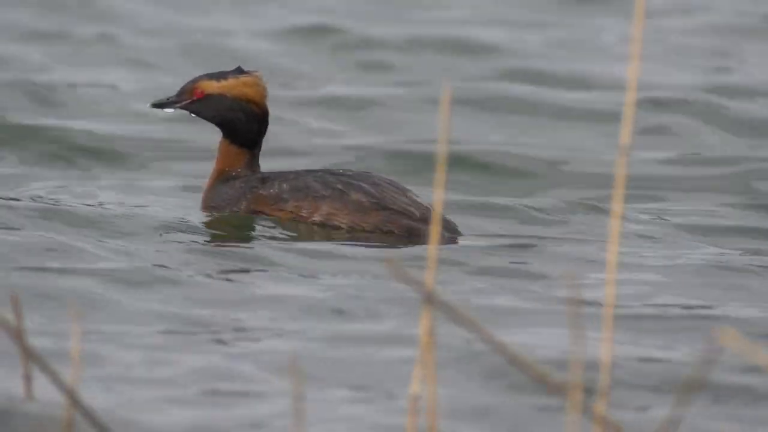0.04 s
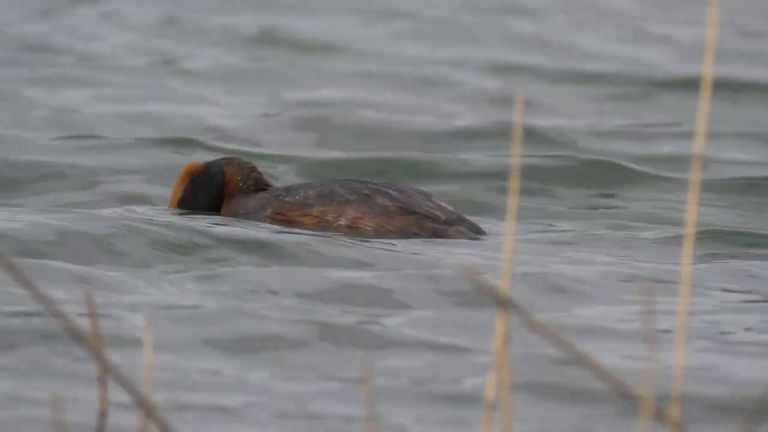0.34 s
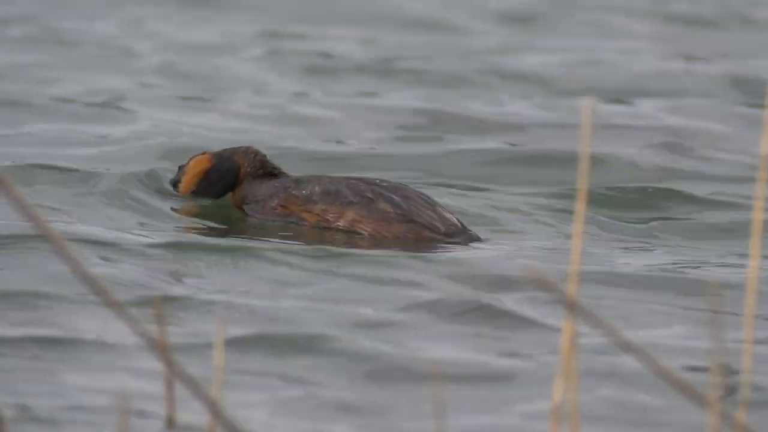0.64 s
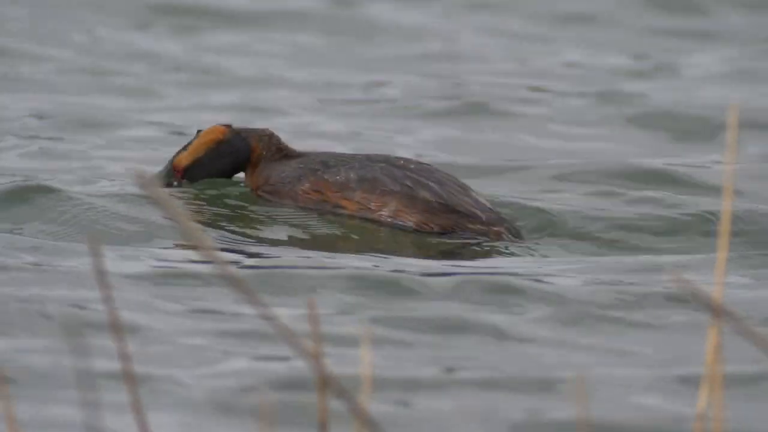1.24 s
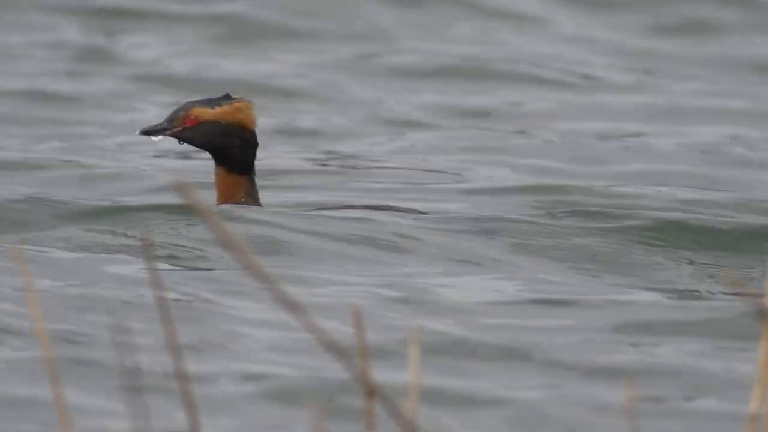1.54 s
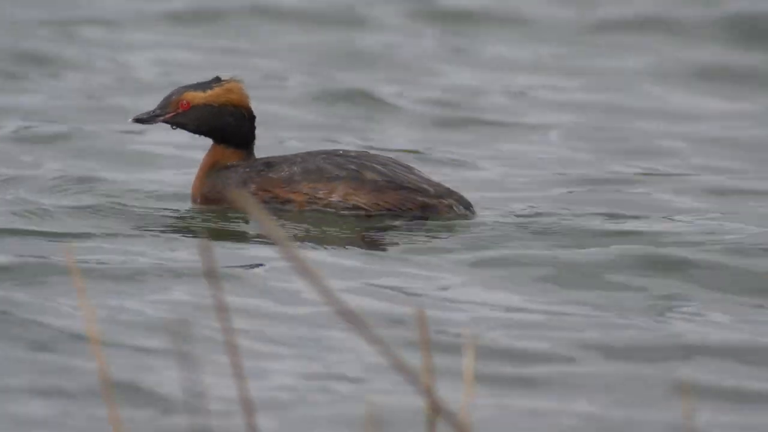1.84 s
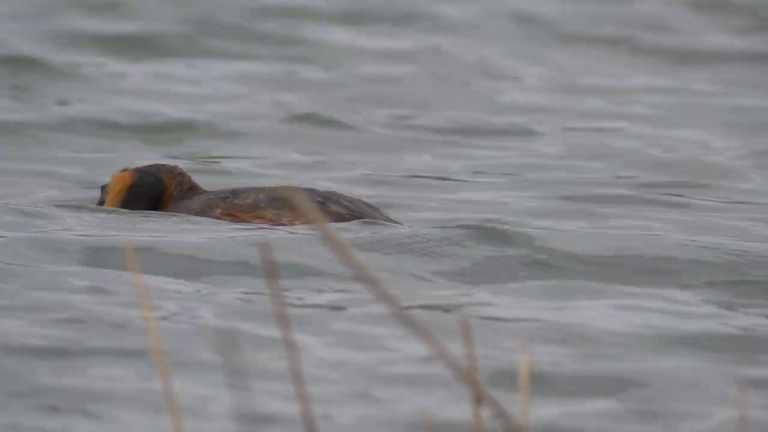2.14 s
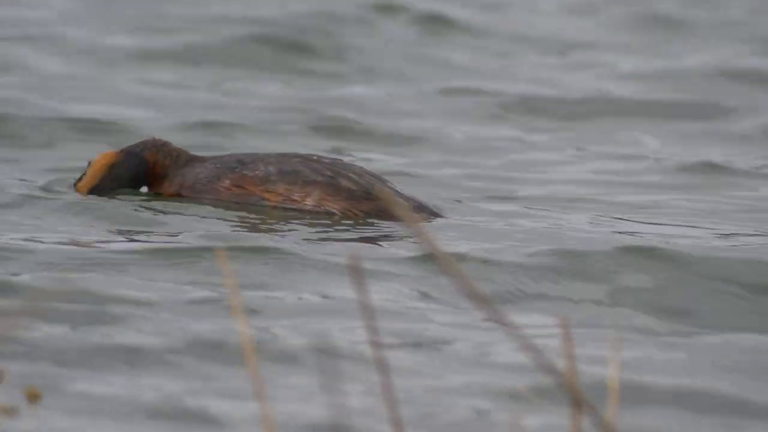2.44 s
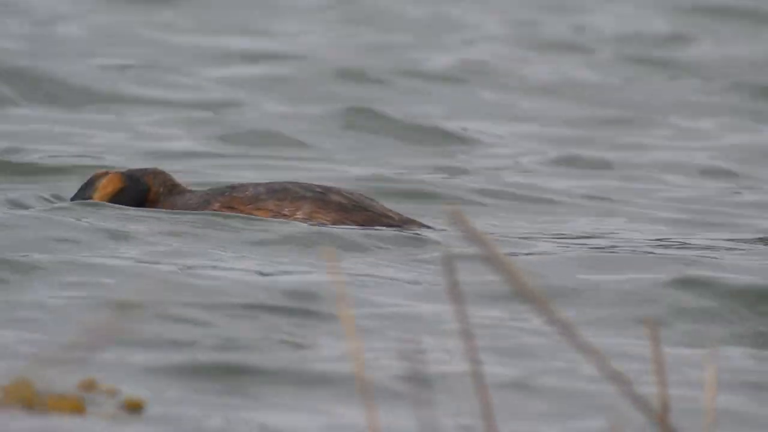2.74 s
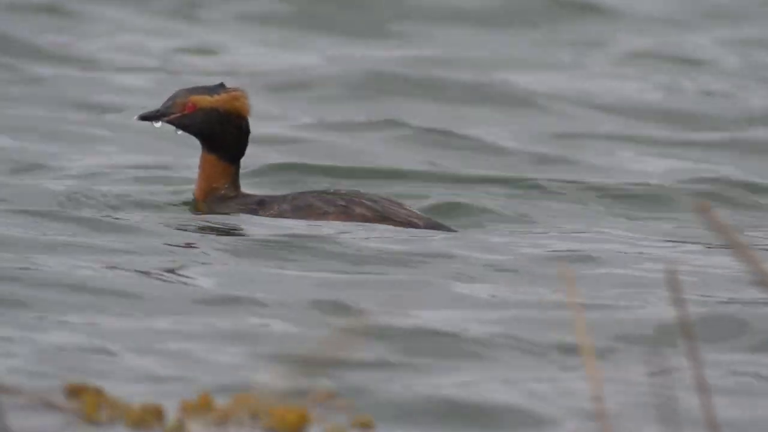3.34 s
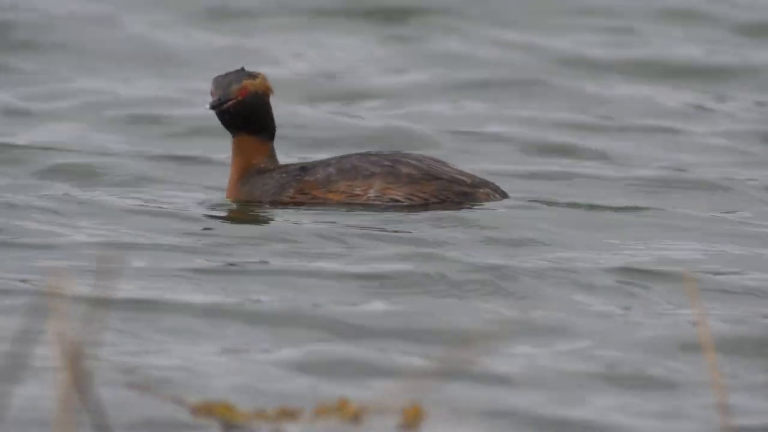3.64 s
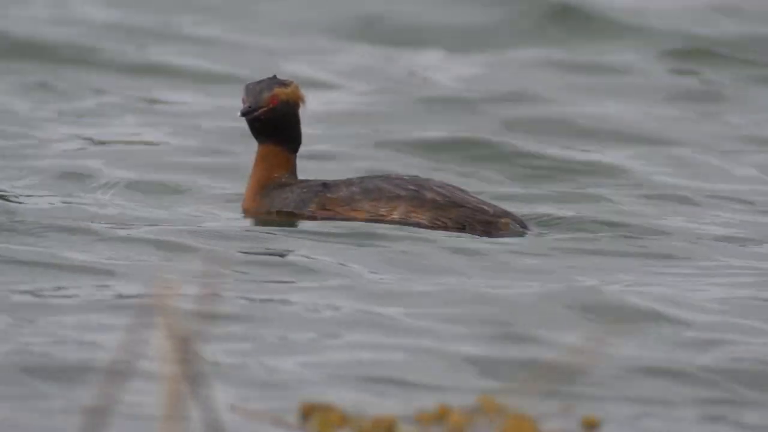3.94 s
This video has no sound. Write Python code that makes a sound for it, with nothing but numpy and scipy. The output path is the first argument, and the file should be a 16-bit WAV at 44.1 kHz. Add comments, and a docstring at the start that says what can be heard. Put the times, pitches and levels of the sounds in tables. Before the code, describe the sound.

Terns call at a lake shore, first with harsh rattling rasps, then a run of high piping notes and trills. Distant gulls wail near the end. Wind rumbles and thumps on the microphone throughout, over faintly washing water.

```python
"""Wind rumbles and thumps on a microphone at a lake shore while waterbirds call.
Terns rasp and yelp (harmonic pulses shaped by the throat), pipe and trill (near-pure tones).
A duck whistles once and distant gulls wail, each on one gliding partial.
Small waves wash and drip as coloured noise; the shore returns a faint echo of the calls."""
import sys
import numpy as np
from scipy import signal
from scipy.fft import rfft, irfft, next_fast_len
from scipy.io import wavfile
from scipy.ndimage import map_coordinates

SR = 44100
rng = np.random.default_rng(int(sys.argv[2]) if len(sys.argv) > 2 else 0)


def to_wav(sig):
    """Store sig (one row per channel, or 1-D mono) as 16-bit WAV at the path in sys.argv[1].

    Samples outside -1..1 are clipped; the rate is SR.
    """
    pcm = np.clip(np.atleast_2d(sig), -1, 1) * 32767
    pcm = np.round(pcm).astype(np.int16)
    wavfile.write(sys.argv[1], SR, pcm.T)  # frames by channels


N = 176400

# tern throat response (frequency [Hz], gain [dB])
TERN_THROAT = [(1000, -47), (2350, -8.5), (2620, 1), (3000, 2), (3350, -4.5), (3950, 4), (4400, 1.5),
               (5200, -28), (6150, -15.5), (7200, -39)]
TERN_PITCH_HZ = 773.3


def amp(db):
    """Decibels to gain."""
    return 10 ** (np.asarray(db) / 20)


def unit(x):
    """Scale to rms 1."""
    return x / np.sqrt(np.mean(x ** 2) + 1e-20)


def colour(x, points, tilt_db=0):
    """Filter by (Hz, dB) points; tilt_db peaks at 4.4 kHz, fading to 0 an octave either side."""
    size = next_fast_len(x.shape[-1], True)
    hz = np.fft.rfftfreq(size, 1 / SR) + 1
    point_hz, point_db = np.transpose(points)
    gain_db = np.interp(np.log(hz), np.log(point_hz), point_db)
    gain_db += tilt_db * np.clip(1 - abs(np.log2(hz / 4400)), 0, 1)
    return irfft(rfft(x, size) * amp(gain_db), size)[..., :x.shape[-1]]


def wander(size, rate_hz):
    """Smooth random curve, rms about 1."""
    at = np.arange(size) * rate_hz / SR
    return map_coordinates(rng.standard_normal(4096), [at], order=2, mode="wrap")


def level(curve):
    """Gain along (s, dB) points."""
    return amp(np.interp(np.arange(N) / SR, *np.transpose(curve)))


def pan(db):
    """Stereo gains for a left-minus-right level."""
    return amp(np.array([[db / 2], [-db / 2]]))


def add(mix, start_s, sound):
    """Mix a sound in at start_s."""
    start = round(start_s * SR)
    sound = sound[max(-start, 0):]
    part = mix[max(start, 0):][:len(sound)]
    part += sound[:len(part)]


def gate(t, attack_s, release_s):
    """Envelope with quarter-sine ramps."""
    rise = np.sin(np.pi / 2 * np.clip(t / attack_s, 0, 1))
    fall = np.sin(np.pi / 2 * np.clip((t[-1] - t) / release_s, 0, 1))
    return rise * fall


def phase(hz):
    """Running phase [rad] of a pitch curve."""
    return 2 * np.pi * np.cumsum(hz) / SR


def stereo_noise(points, correlation):
    """Coloured noise, partly shared by both channels."""
    mid, side = rng.standard_normal((2, N))
    side *= np.sqrt((1 - correlation) / (1 + correlation))
    return unit(colour(np.array([mid + side, mid - side]), points))


def burst(hz, decay_s, skirt_db):
    """Fast-dying noise puff centred on hz, at skirt_db an octave above."""
    t = np.arange(8192) / SR
    band = [(hz / 8, 2 * skirt_db), (hz / 2, skirt_db / 2), (hz, 0),
            (hz * 2, skirt_db), (hz * 8, 4 * skirt_db)]
    noise = colour(rng.standard_normal(len(t)), band)
    envelope = t / decay_s * 2 * np.exp(1 - 2 * t / decay_s)
    return unit(noise * envelope) * np.sqrt(np.mean(envelope ** 2))


def wind():
    """Wind on the microphone: lumpy rumble and a few hard buffets."""
    # wind strength (time [s], level [dB])
    gusts = [(.05, -22), (.2, -31.5), (.36, -30.5), (.8, -40), (.9, -31), (1.03, -32), (1.33, -28),
             (1.62, -35), (2.3, -33), (2.75, -29.5), (2.97, -36.5), (3.3, -37), (3.65, -40), (3.95, -37.5)]
    # rumble spectrum (frequency [Hz], gain [dB])
    spectrum = [(36, -42.5), (70, -12.5), (95, -3), (150, 2), (240, -5), (330, -18), (560, -36),
                (5000, -91.5)]
    # buffets (time [s], level [dB], centre [Hz], decay [s])
    hits = [(.121, -18.5, 245, 0.012), (0.286, -25.5, 280, 0.0082), (.315, -32, 300, 0.041),
            (3.545, -28.5, 137, 0.011), (3.982, -29.5, 267, 0.037)]
    # stereo balance (frequency [Hz], left minus right [dB])
    balance = [(150, 4.5), (250, -4)]
    rumble = unit(stereo_noise(spectrum, 0.89) * amp(1.54 * wander(N, 25.01))) * level(gusts)
    buffets = np.zeros(N)
    for start_s, db, hz, decay_s in hits:
        add(buffets, start_s, amp(db) * burst(hz, decay_s, skirt_db=-24))
    left, right = rumble + buffets
    return np.array([colour(left, [(hz, db / 2) for hz, db in balance]),
                     colour(right, [(hz, -db / 2) for hz, db in balance])])


def water():
    """Small waves: soft wash, thin hiss, single drips."""
    # wave swell (time [s], level [dB])
    swell = [(.5, -62.5), (1.1, -55), (2.1, -60)]
    # wash spectrum (frequency [Hz], gain [dB])
    wash_spectrum = [(600, -2.5), (1300, -1.5), (1600, -19.5), (2100, -14), (2600, -22.5), (3100, -15.5),
                     (4200, -17.5), (5500, -41.5)]
    # hiss spectrum (frequency [Hz], gain [dB])
    hiss_spectrum = [(6200, 1.5), (7800, -6), (9800, 6.5), (15000, -3.5)]
    # drips and small splashes (time [s], level [dB], centre [Hz])
    drops = [(.862, -64.5, 10100), (2.546, -49, 1080), (2.857, -66, 9800), (3.211, -61, 11000)]
    drips = np.zeros(N)
    for start_s, db, hz in drops:
        add(drips, start_s, amp(db) * burst(hz, decay_s=0.0054, skirt_db=-26))
    wash = stereo_noise(wash_spectrum, 0.74) * level(swell) * amp(wander(N, 20))
    hiss = amp(-72.5) * stereo_noise(hiss_spectrum, 0.86) * amp(0.96 * wander(N, 47))
    return wash + pan(-0.5) * (drips + hiss)


def tern_voice(hz, noise_gain, tilt_db):
    """Nine equal syrinx harmonics plus noise, filtered by the throat."""
    pulses = unit(np.cos(np.arange(1, 10)[:, None] * phase(hz)).sum(0))
    return unit(colour(pulses + noise_gain * rng.standard_normal(len(hz)), TERN_THROAT, tilt_db))


def tern_rasps(rattle_hz=61, depth=0.91):
    """Rough voice chopped into a rattle; pitch bends within each beat."""
    # harsh rasps (time [s], length [s], level [dB], brightness [dB])
    calls = [(-.14, 0.18, -47.5, -5), (0.083, 0.39, -57.5, -6.5), (.662, .38, -61, -7),
             (1.295, .36, -61.5, -8.5), (2.111, 0.31, -66, -12), (2.637, 0.16, -64, 6),
             (2.746, 0.26, -56.5, 9.5), (3.467, 0.36, -63.5, -7)]
    out = np.zeros(N)
    for start_s, length_s, db, tilt_db in calls:
        t = np.arange(0, length_s, 1 / SR)
        beat = phase(rattle_hz * (1 + 0.06 * wander(len(t), 36)))
        opening = (1 - np.cos(beat)) / 2
        sag = 0.0701 * (np.exp(-5 * t / length_s) - .3)
        bend = 0.042 * (opening - 1 + .4 * np.sin(beat))
        hz = TERN_PITCH_HZ * (1 + sag + bend + 0.0265 * wander(len(t), 900))
        voice = tern_voice(hz, noise_gain=0.5, tilt_db=tilt_db)
        rattle = (1 - depth + depth * opening ** 1.86) * amp(2 * wander(len(t), rattle_hz))
        envelope = gate(t, attack_s=0.12 * length_s, release_s=0.29 * length_s)
        add(out, start_s, amp(db) * envelope * unit(voice * rattle))
    return out


def cry(curve, jitter, roughness, overtone_db, sideband_hz=233.3):
    """Gliding partial and weak octave; amplitude modulation adds hoarse sidebands."""
    times_s, hz, db = np.transpose(curve)
    t = np.arange(times_s[0], times_s[-1], 1 / SR)
    angle = phase(np.interp(t, times_s, hz) * (1 + jitter * wander(len(t), 490)))
    tone = np.sin(angle) + amp(overtone_db) * np.sin(2 * angle)
    hoarse = 1 + 2 * roughness * np.cos(phase(sideband_hz * (1 + 0.11 * wander(len(t), 202))))
    envelope = amp(np.interp(t, times_s, db)) * gate(t, attack_s=.015, release_s=.015)
    out = np.zeros(N)
    add(out, times_s[0], envelope * unit(hoarse * tone))
    return out


def duck_whistle():
    """One clean whistle, rising then falling."""
    # whistle contour (time [s], pitch [Hz], level [dB])
    contour = [(.068, 1876, -57), (.178, 2260, -57.5), (.218, 2330, -63.5), (.268, 2060, -54.5),
               (.315, 2000, -62)]
    return cry(contour, jitter=.005, roughness=0.031, overtone_db=-21)


def gull_wails():
    """Distant hoarse cries with unsteady pitch."""
    # one contour per wail (time [s], pitch [Hz], level [dB])
    contours = [
        [(.275, 1322, -53.5), (.33, 1288, -65)],
        [(1.475, 1790, -61), (1.54, 1974, -56)],
        [(3.045, 1325, -53.5), (3.175, 1390, -57.5), (3.22, 1330, -56.5), (3.275, 940, -52.5)],
        [(3.31, 1098, -53.5), (3.367, 1190, -50.5), (3.44, 1007, -49)],
        [(3.465, 1180, -53), (3.53, 1406, -57)],
    ]
    return sum(cry(curve, jitter=0.035, roughness=0.18, overtone_db=-27.5) for curve in contours)


def tern_pipes(length_s=0.059):
    """Near-pure notes on a shallow pitch arch."""
    # piping notes (time [s], level [dB], pitch [Hz])
    notes = [(.482, -60, 3610), (1.644, -62, 3580), (1.777, -59, 3810), (1.915, -54.5, 3880),
             (2.056, -55, 3924), (2.204, -51, 3890), (2.355, -54.5, 3923), (2.496, -57.5, 3914),
             (2.651, -61, 3950), (3.17, -58, 3510), (3.532, -59.5, 3610), (3.837, -60.5, 3790)]
    t = np.arange(0, length_s, 1 / SR)
    arch = 1 - 0.202 * (t / length_s - 0.398) ** 2
    envelope = gate(t, attack_s=0.0065, release_s=0.025)
    out = np.zeros(N)
    for start_s, db, hz in notes:
        tone = np.sin(phase(hz * (arch + 0.0019 * wander(len(t), 600))))
        add(out, start_s, amp(db) * envelope * unit(tone))
    return out


def tern_yelps(length_s=.033):
    """Short harmonic calls; pitch drops at the end."""
    # yelps (time [s], level [dB], brightness [dB])
    calls = [(0.578, -59, -31), (0.994, -60.5, -21), (1.2, -64, 4), (1.714, -63, -20.5),
             (1.836, -62.5, -17), (2.441, -60.5, -14), (2.555, -61, -5), (3.053, -55.5, 2),
             (3.172, -57.5, -1), (3.862, -63, -16), (3.957, -57.5, -10)]
    t = np.arange(0, length_s, 1 / SR)
    fall = 1 - 0.13 * (t / length_s) ** 3
    envelope = gate(t, attack_s=0.0044, release_s=0.0061)
    out = np.zeros(N)
    for start_s, db, tilt_db in calls:
        hz = TERN_PITCH_HZ * (fall + 0.015 * wander(len(t), 610))
        add(out, start_s, amp(db) * envelope * tern_voice(hz, noise_gain=0.36, tilt_db=tilt_db))
    return out


def tern_trills():
    """Piping notes broken into quick beats, each sliding down."""
    # high trills (time [s], length [s], level [dB], pitch [Hz], beat rate [Hz])
    calls = [(1.981, 0.13, -61, 3470, 48), (2.971, 0.114, -63, 3380, 60), (3.34, 0.146, -48.5, 3563, 46.8)]
    out = np.zeros(N)
    for start_s, length_s, db, hz, beat_hz in calls:
        t = np.arange(0, length_s, 1 / SR)
        beat = 2 * np.pi * beat_hz * t
        arch = 1 - 0.063 * (2 * t / length_s - 1) ** 2
        pitch_hz = hz * (arch + 0.015 * np.sin(beat) + 0.016 * wander(len(t), 675))
        tone = np.sqrt(2) * np.sin(phase(pitch_hz))
        chop = 0.05 + np.sin(beat / 2) ** 2
        add(out, start_s, amp(db) * gate(t, attack_s=0.034, release_s=0.027) * chop * tone)
    return out


def shore_echo(calls, t60_s=0.52, onset_s=.02):
    """Diffuse stereo reflection with reduced treble."""
    t = np.arange(SR) / SR
    envelope = amp(-60 * t / t60_s) * np.minimum(t / onset_s, 1)
    tail = stereo_noise([(2200, 5), (4000, -1.5)], correlation=0.25)[:, :SR] * envelope
    return signal.fftconvolve(calls[None], tail / np.linalg.norm(tail[0]), axes=1)[:, :N]


def scene():
    """Birds and their echo, slightly right, over wind and water."""
    terns = tern_rasps() + tern_yelps() + tern_pipes() + tern_trills()
    calls = terns + duck_whistle() + gull_wails()
    return pan(-2.1) * (calls + amp(-12.5) * shore_echo(calls)) + wind() + water()


def record(dry):
    """Recorder band limit."""
    cutoff_hz = 15700
    lowpass = signal.firwin(511, cutoff_hz, window=("kaiser", 9), fs=SR)
    return signal.oaconvolve(dry, lowpass[None], "same")


dry = scene()
out = record(dry)
to_wav(out)
```